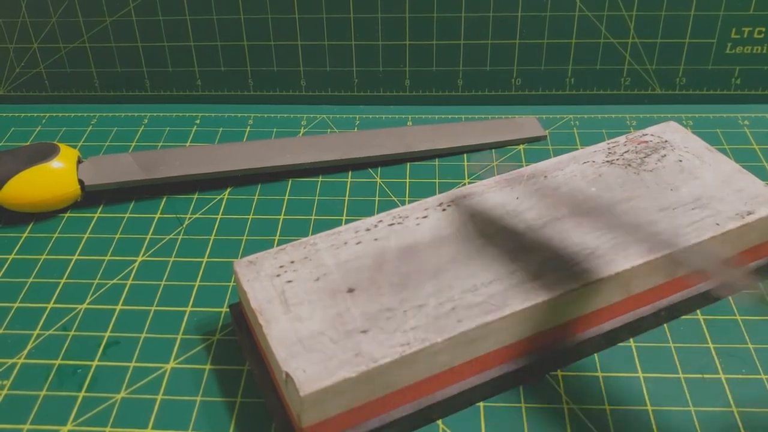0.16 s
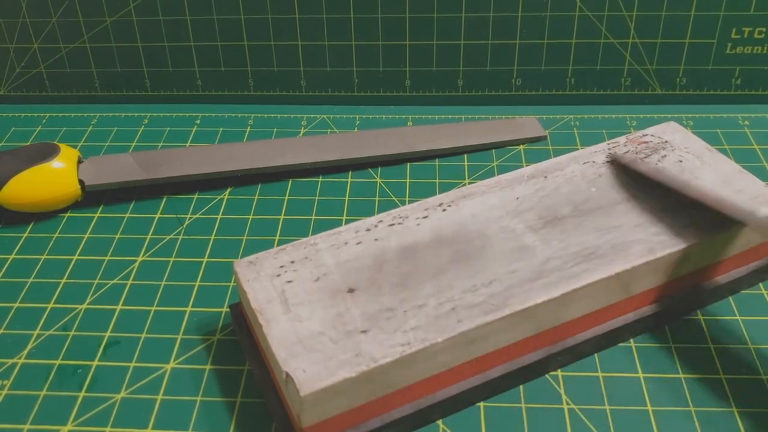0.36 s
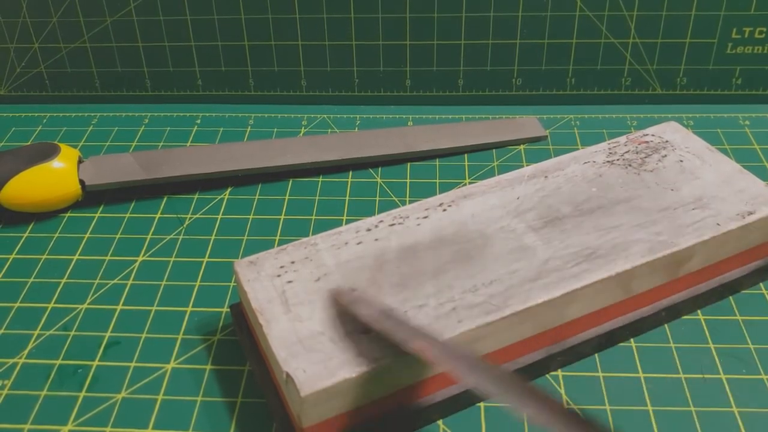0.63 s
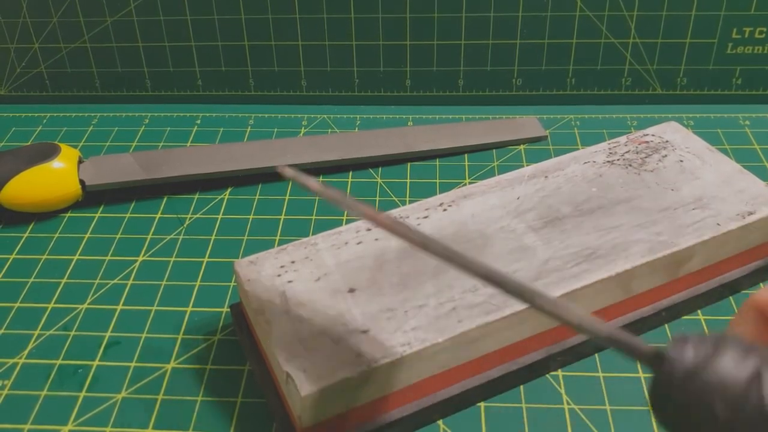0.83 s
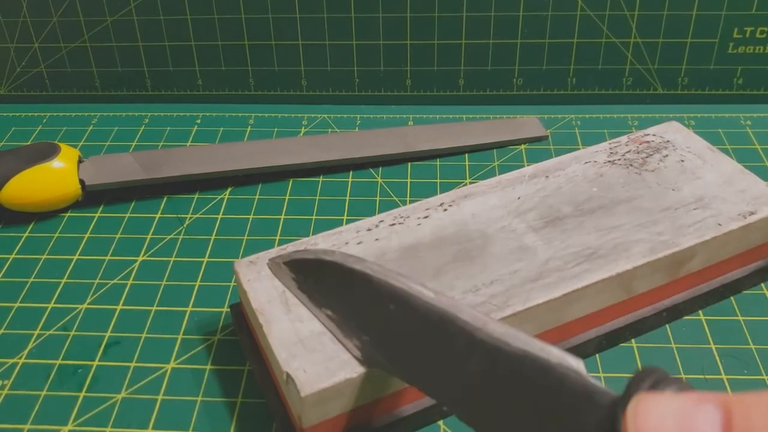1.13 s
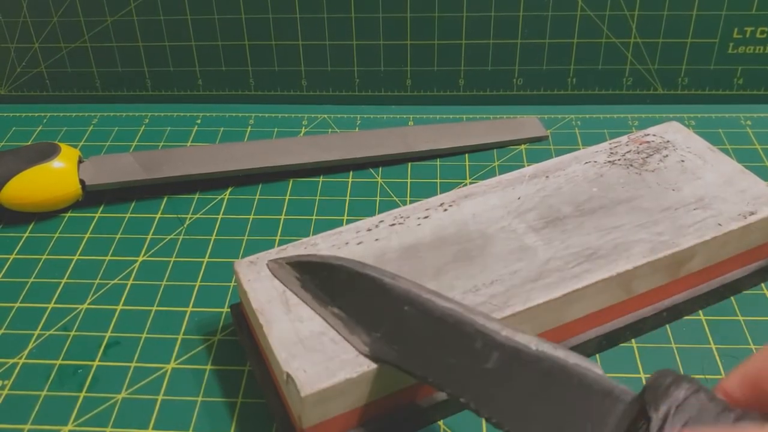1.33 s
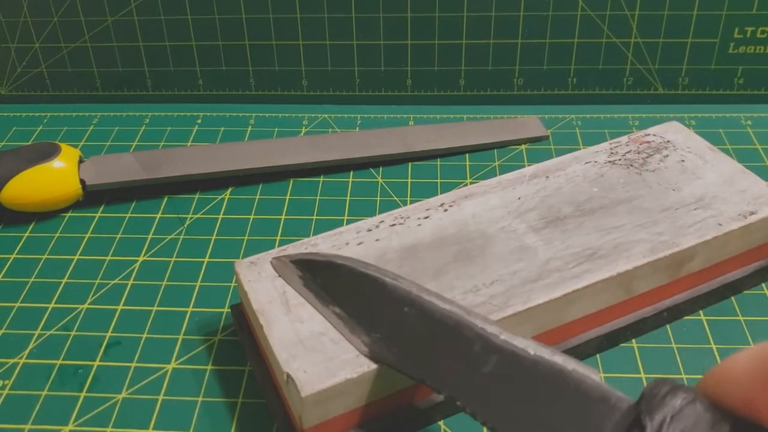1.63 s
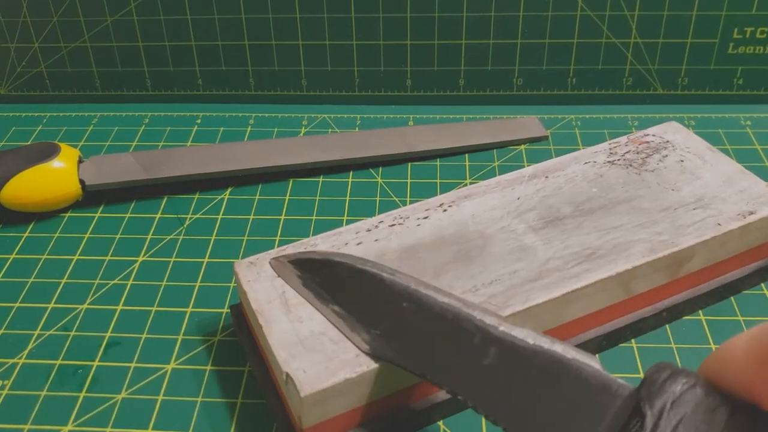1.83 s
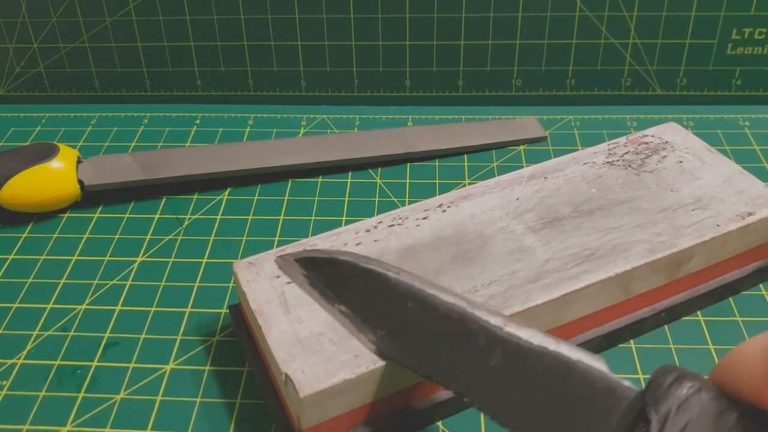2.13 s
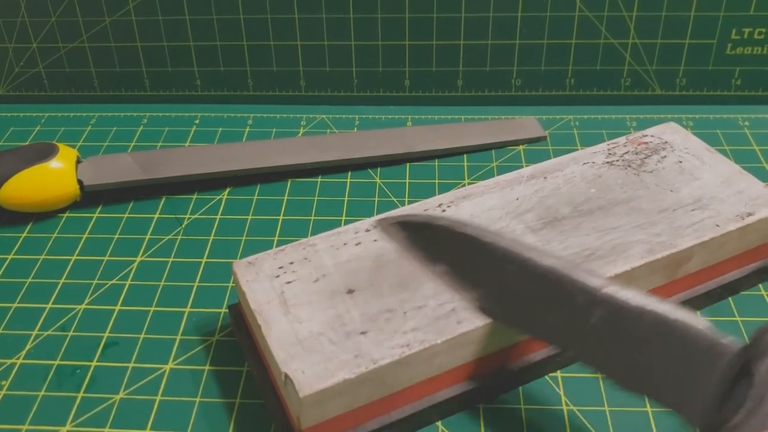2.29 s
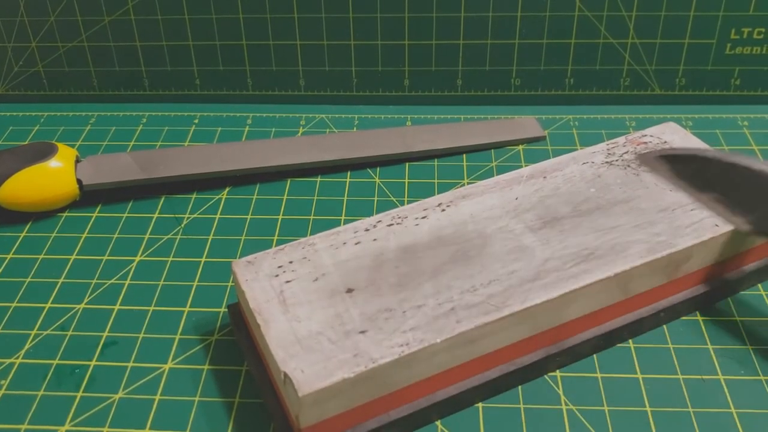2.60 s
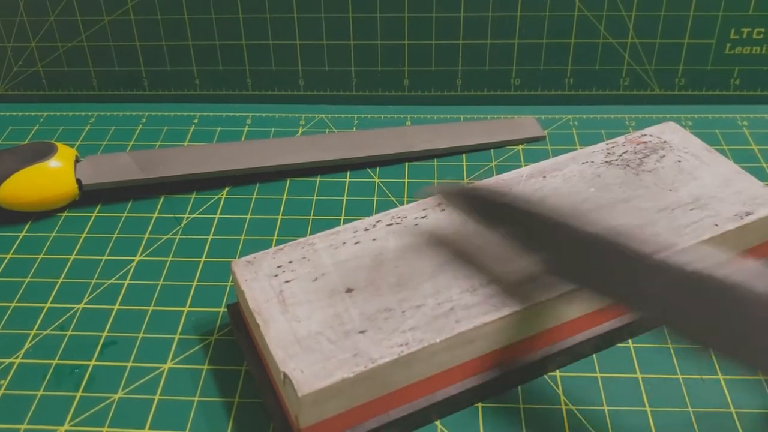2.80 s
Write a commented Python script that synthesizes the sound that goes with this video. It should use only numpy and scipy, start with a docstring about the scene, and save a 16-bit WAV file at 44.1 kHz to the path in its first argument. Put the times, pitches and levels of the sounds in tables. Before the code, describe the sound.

Knife blade scraping on a whetstone, close stereo microphones in a quiet room: the end of one stroke, a full bright stroke, a sharp clack, faint handling and squeaks, then a longer final scrape.

```python
"""Quiet room, work table: a knife is drawn over a wet stone close to a pair of microphones, in three strokes.
Grit, as dense tiny impacts, drives blade and stone resonances that change level with the contact point,
and a table thrum of fixed pitch. Knocks are noise bursts plus dying modes; the handle rustles and taps;
the tip squeaks before the last stroke. Shaped noise gives low rumble and faint air; sparse decaying
reflections give the room."""
import sys
import numpy as np
from scipy import signal
from scipy.fft import rfft, irfft, next_fast_len
from scipy.io import wavfile
from scipy.ndimage import uniform_filter1d

SR = 44100
rng = np.random.default_rng(int(sys.argv[2]) if len(sys.argv) > 2 else 0)


def undo_db(level):
    """Turn decibels back into plain size, where 20 dB means ten times bigger."""
    steps = np.asarray(level, float) / 20
    return 10 ** steps


def persist_wave(psi):
    """Save psi, clipped to +-1, as 16-bit WAV."""
    counts = np.round(np.clip(psi, -1, 1) * 32767).astype(np.int16)
    wavfile.write(sys.argv[1], SR, np.atleast_2d(counts).T)


N = 130095
T_S = np.arange(N) / SR
RING_T_S = np.arange(SR // 2) / SR
BIN_HZ = np.fft.rfftfreq(next_fast_len(N), 1 / SR)
FFT_SIZE = 2 * len(BIN_HZ) - 2

# Widths are those of a single resonance, before any power is taken. Mode and curve levels are relative.
# Places are linear scales that run past their named ends.

# Rumble spectrum: f/Hz, density/dB
RUMBLE = [(20, -53), (40, -15), (58, -3), (78, 4), (105, -10), (125, -6.5), (147, -4.5), (175, -13),
          (212, -12.5), (290, -20.5), (600, -54.5), (1000, -81.5)]
# Air spectrum: f/Hz, density/dB
AIR = [(240, -38.5), (400, -8.5), (643, -15.5), (1220, -19.5), (9500, -28), (15500, -20)]
RUMBLE_DB, AIR_DB = -51, -69.5  # before wander
BASS_LEFT_OVER_RIGHT_DB = 1
# Left-right likeness: f/Hz, likeness/0-1
LIKENESS = [(60, 0.92), (400, 0.87), (1000, 0.72), (1800, 0.25), (2500, 0.47), (6000, 0.085),]
LEFT_LAG_S = .00008

# Strokes, one list each: t/s, grit level/dB, stone over grit/dB, table thrum over grit/dB,
# blade brightness/(dB per octave), contact place (heel -1, tip 1)
STROKES = [
    [(0, -34, -12.5, -46, 8.5, 0.14), (.022, -38.5, -3, -17, 7.5, 0.69), (.034, -48.5, 3.5, 4.5, 6, -1.5),
     (.052, -73, 22.5, 4, -14, -1.9), (.06, -41.5, -2.5, -9, 14.5, 0.1), (.078, -41, -9.5, -8, 10.5, 0.44),
     (.09, -67.5, -9, 16, 6, -0.47), (.13, -71, -6, 12.5, -18, -0.51)],
    [(.352, -34, 5, -9, -24, -1.6), (.365, -38.5, -3.5, -27, 4, 0.22), (.382, -31, -15, -35, 9, -0.4),
     (.44, -29.5, -13.5, -22, 7.5, -0.059), (.51, -27, -15.5, -42, 7.5, 0.55),
     (.56, -27.5, -13.5, -59, 8.5, 1), (.63, -31.5, -8, -50, 2.5, 0.88), (.685, -33, -8, -39, 4.5, 0.16),
     (.705, -55, -24, -27, 3, 0.51)],
    [(2.1, -69.5, -3, -7, -6, -0.61), (2.14, -48, -14, -22, -1, -0.26),
     (2.185, -37, -17.5, -19.5, -0.5, 0.032), (2.3, -34.5, -13.5, -20.5, -0.5, -0.0084),
     (2.42, -32.5, -19.5, -17.5, 2.5, 0.2), (2.445, -32, -16, -50, 4, 0.58),
     (2.54, -29.5, -19.5, -56, 3.5, 1), (2.615, -32.5, -16, -65, 2.5, 0.97),
     (2.66, -50.5, -9, -22, -3, 0.83), (2.69, -102, 6, -22, 37, 0.89)],
]
# Blade bending modes: f/Hz, width/Hz, left level/dB, right level/dB,
# left gain middle to tip/dB, right gain middle to tip/dB
BLADE_MODES = [(3420, 910, -3.5, -2, 3.5, 3), (4044, 430, -2, -1.5, 4.5, 10), (4785, 340, 5.5, 2, -5.5, 0),
               (5344, 590, -4.5, 2.5, -4, -5.5), (6520, 520, 0.5, -2, 0.4, 0),
               (7180, 1160, -1, -6.5, -7, 2.5), (8890, 640, -14.5, -0.5, -2.5, 3.5),
               (9860, 250, -11, -12, 14, -1.5), (11490, 490, -1.5, -2.2, -6.5, 2),
               (12850, 270, -8, -6.5, -14, 4.5), (14700, 150, -15, -13.5, -5, 12.5),
               (14940, 320, -11, 0, -8, -8)]
# Stone under the stroke: f/Hz, width/Hz, level/dB, gain middle to tip/dB
STONE_MODES = [(863, 170, 2.5, 4.5), (1111, 400, 3.5, -2), (1633, 1070, 3, 0.5), (2284, 3260, -6.5, 2.5)]
# Table thrum: f/Hz, width/Hz, level/dB
THRUM_MODES = [(237, 100, 6.5), (660, 550, 2.5)]
# Stone brightness, one per stroke: tilt/(dB per octave)
STONE_TILTS = [0.11, .3, -3.3]
GRITS_PER_S, GRIT_SPREAD_DB = 12000, 3
BLADE_WANDER_DB, BLADE_BEND_SHARE = 3.5, .008
PATCH_RMS_DB, HISS_DB = 2.5, -12
NOTCH_HZ, NOTCH_SLIDE_HZ, NOTCH_WIDTH_HZ, NOTCH_DEPTH = 3930, -950, 270, .85  # slide: middle to tip

# Blade meets stone: t/s, stone level/dB, table level/dB, crack level/dB, crack f/Hz,
# landing place (far end -1, near end 1)
KNOCKS = [(0.3487, -21.5, -26, -19, 6430, -0.46), (0.3591, -34.5, -62, -39, 4420, -1.1),
          (1.1407, -18.5, -35, -17, 4600, 1), (1.143, -25, -45.5, -52, 4150, .7),
          (1.155, -22.5, -36.5, -35.5, 4060, 0.92), (1.32, -74.5, -86, -56, 13000, 0.27),
          (1.636, -36.5, -38.5, -35.5, 3940, 0.15), (1.732, -66, -75, -51.5, 5130, -0.1)]
# Struck stone: f/Hz, level/dB, t60/s, gain middle to near end/dB
CLACK_MODES = [(354, -15, 0.041, -2.5), (643.4, -12, 0.053, -1.5), (865, 2, 0.013, -6.5),
               (1037, 3, 0.015, 0), (1511, -1, 0.011, 6.5), (1907, -4, .012, 1), (2810, -12, .016, 1.5)]
# Struck table: f/Hz, level/dB, t60/s, gain middle to near end/dB
BOOM_MODES = [(86, -6, 0.15, 5.5), (133, -9, 0.42, -2), (147.8, -7.5, 0.34, -6), (238.3, -0.5, 0.11, 5)]
CRUNCH_DECAY_S, CONTACT_CYCLES = .0017, .8
CRACK_EDGE_RATIO = 1.85  # band edge to crack frequency, each way
STONE_LEFT_OVER_RIGHT_DB = 3.5

# Fingers shifting on the handle: t/s, level/dB, left over right/dB
GRIP = [(.81, -92, 3), (.835, -62, 2), (.88, -63.5, -8), (.895, -51.5, -2.5), (.95, -50, -1.5),
        (.965, -69.5, -29), (1.03, -64, 3.5), (1.125, -67, -8), (1.2, -52, -4), (1.35, -70.5, 9),
        (1.47, -80, 30.5)]
# Rustle spectrum: f/Hz, gain/dB
GRIP_COLOUR = [(410, -68.5), (700, -36.5), (1690, -10), (3400, -11), (5220, -9), (15500, -3.5)]

# Handle settling: t/s, level/dB
HANDLE_TAPS = [(1.381, -51.5), (1.408, -55)]
# Handle modes: f/Hz, level/dB, t60/s
HANDLE_MODES = [(395, -1.5, 0.095), (660, -3.5, 0.024), (1114, 0, 0.033)]

# Tip drag: t/s, upper squeak level/dB, lower squeak level/dB
DRAG = [(1.65, -73, -63), (1.79, -73, -65), (1.815, -58, -68), (1.845, -55.5, -69), (1.875, -70, -65),
        (1.93, -55, -62), (1.98, -52, -64), (2.04, -58, -65.5), (2.1, -66, -63.5), (2.13, -62, -67)]
# Upper squeaks: f/Hz, width/Hz, level/dB
UPPER_SQUEAKS = [(6180, 74, 7), (7070, 140, -10), (7800, 110, -13)]
# Lower squeak: f/Hz, width/Hz, level/dB
LOWER_SQUEAKS = [(4620, 630, 19), (4030, 750, -10)]
TIP_LEFT_OVER_RIGHT_DB = 5

# Room decay: f/Hz, t60/s
ROOM_DECAY = [(250, 0.67), (1000, 0.36), (12000, 0.21)]
ROOM_DB = -14.5


def evened(x):
    """Scales to rms 1."""
    return x / np.sqrt(np.mean(x ** 2) + 1e-20)


def read(points, hz):
    """Straight lines on a log-frequency axis."""
    f, value = np.transpose(points)
    return np.interp(np.log(hz + 1), np.log(f + 1), value)


def coloured(x, gain):
    """Filters by a gain over BIN_HZ, to rms 1."""
    return evened(irfft(rfft(x, FFT_SIZE) * gain)[..., :N])


def peak(hz, width_hz, axis_hz=BIN_HZ):
    """Complex response of one resonance."""
    return 1 / (1 + 2j * (axis_hz - hz) / max(width_hz, 10))


def sides(left_over_right_db):
    """Left and right gains for a level difference."""
    half_db = left_over_right_db / 2
    return undo_db(np.array([half_db, -half_db]))


def along(rows, column):
    """One column of a table through time."""
    rows = np.array(rows)
    return np.interp(T_S, rows[:, 0], rows[:, column])


def gate(rows):
    """Level column as gain, silent outside the table's span, edges smoothed."""
    inside = 1. * (T_S >= rows[0][0]) * (T_S <= rows[-1][0])
    return undo_db(along(rows, 1)) * uniform_filter1d(inside, size=200, mode="nearest")


def pair(a, b):
    """Stereo pair, more alike in the bass than in the treble; left lags."""
    likeness = np.clip(read(LIKENESS, BIN_HZ), 0, 1)
    a, b = rfft(a, FFT_SIZE), rfft(b, FFT_SIZE)
    left = a * np.exp(-2j * np.pi * BIN_HZ * LEFT_LAG_S)
    right = likeness * a + np.sqrt(1 - likeness ** 2) * b
    return irfft(np.array([left, right]))[:, :N]


def wander(per_s):
    """Two slow random curves: straight lines between unit-normal values."""
    steps = rng.standard_normal((2, 200))
    return np.array([np.interp(T_S * per_s, np.arange(200), s) for s in steps])


def ring(hz, db, t60_s):
    """One exponentially dying mode, half a second long."""
    return undo_db(db - 60 * RING_T_S / t60_s) * np.sin(2 * np.pi * hz * RING_T_S)


def grit():
    """Dense tiny impacts of uneven size and random sign, as a stereo pair of rms 1."""
    size_draw, sign_draw, hit_draw = rng.random((3, 2, N))
    size = undo_db(GRIT_SPREAD_DB * -np.log(size_draw + 0.0059))
    hits = size * np.sign(sign_draw - .5) * (hit_draw < GRITS_PER_S / SR)
    return evened(pair(*hits))


def background():
    """Low noise nearly equal on both sides, in uneven lumps, and faint air noise."""
    low = coloured(pair(*rng.standard_normal((2, N))), undo_db(read(RUMBLE, BIN_HZ)))
    low = low * undo_db(2.0 * wander(8.51)[0])
    air = coloured(pair(*rng.standard_normal((2, N))), undo_db(read(AIR, BIN_HZ)))
    air = air * undo_db(1.0 * wander(2)[0])
    return undo_db(RUMBLE_DB) * low * sides(BASS_LEFT_OVER_RIGHT_DB)[:, None] + undo_db(AIR_DB) * air


def blade_power(hz, at, tilt, place):
    """Bending modes change level with contact place and waver at random in level and pitch."""
    power = undo_db(2 * HISS_DB) * (hz > 2300)
    for f, width, left, right, left_tip, right_tip in BLADE_MODES:
        db = np.array([left + left_tip * place, right + right_tip * place])
        db = db + BLADE_WANDER_DB * wander(7.07)[:, at]
        bent_hz = f * (1 + BLADE_BEND_SHARE * wander(26)[0, at])
        power = power + undo_db(2 * db)[:, None] * abs(peak(bent_hz, width, hz)) ** 4
    power = power * undo_db(2 * tilt * np.log2((hz + 1) / 7000))
    power = power * abs(1 - peak(0, 2330, hz)) ** 4  # low cut
    # notch slides down as the contact nears the tip
    notch = NOTCH_DEPTH * peak(NOTCH_HZ + NOTCH_SLIDE_HZ * place, NOTCH_WIDTH_HZ, hz)
    return power * abs(1 - notch) ** 2


def stone_power(hz, t_s, place):
    """Broad stone resonances, louder or softer with contact place and tilted per stroke."""
    stroke_ends_s = [rows[-1][0] for rows in STROKES[:-1]]
    tilt = np.array(STONE_TILTS)[np.searchsorted(stroke_ends_s, t_s - .1)]
    power = 0
    for f, width, db, tip_db in STONE_MODES:
        mode_db = db + tip_db * place + tilt * np.log2(f / 1000)
        power = power + undo_db(2 * mode_db) * abs(peak(f, width, hz)) ** 8
    return power


def strokes():
    """Grit excites blade, stone and table: its spectrum is weighted by their power responses."""
    hz, t_s, z = signal.stft(grit(), SR, nperseg=512, noverlap=384)
    hz, at = hz[:, None], np.minimum((t_s * SR).astype(int), N - 1)
    every = [row for rows in STROKES for row in rows]
    stone_db, thrum_db, tilt, place = (along(every, k)[at] for k in range(2, 6))
    blade = blade_power(hz, at, tilt, place)
    stone = stone_power(hz, t_s, place)
    thrum = sum(undo_db(2 * db) * abs(peak(f, width, hz)) ** 4 for f, width, db in THRUM_MODES)
    power = blade / blade.mean(axis=(0, 1))
    power = power + undo_db(2 * stone_db) * stone / stone.mean(axis=0)
    power = power + undo_db(2 * thrum_db) * thrum / thrum.mean()
    # random patches in time and frequency
    patches = uniform_filter1d(rng.standard_normal(z.shape), size=3, axis=1)
    patches = evened(uniform_filter1d(patches, size=20, axis=2))
    z = z * np.sqrt(power) * undo_db(PATCH_RMS_DB * patches)
    scraped = signal.istft(z, SR, nperseg=512, noverlap=384)[1][:, :N]
    return sum(gate(rows) for rows in STROKES) * scraped


def knocks():
    """Contact crunch, stone modes dulled by blunt contact, slower-swelling table modes."""
    out, t_s = np.zeros((2, N)), RING_T_S
    for s, stone_db, table_db, crack_db, crack_hz, place in KNOCKS:
        clack = sum((-1) ** k * ring(f, db + near_db * place, t60)
                    for k, (f, db, t60, near_db) in enumerate(CLACK_MODES))
        clack = clack * (1 - np.exp(-t_s / .0004))
        boom = sum(ring(f, db + near_db * place, t60) for f, db, t60, near_db in BOOM_MODES)
        boom = boom * (1 - np.exp(-t_s / 0.0024))
        burst = rng.standard_normal((2, 500)) * np.exp(-t_s[:500] / CRUNCH_DECAY_S)
        crunch = pair(*np.pad(burst, ((0, 0), (0, N - 500))))[:, :500]
        edges_hz = np.clip([crack_hz / CRACK_EDGE_RATIO, crack_hz * CRACK_EDGE_RATIO], 100, 20000)
        crack = signal.sosfilt(signal.butter(3, edges_hz, "band", fs=SR, output="sos"), crunch)
        crack = crack / np.sqrt(np.mean(crack[:, :80] ** 2))
        # lower crack frequency = longer push = duller stone
        push = np.exp(-t_s[:400] * crack_hz / CONTACT_CYCLES * 2 * np.pi)
        clack = np.convolve(clack, push / push.sum())[:len(t_s)]
        at = round(s * SR)
        out[:, at:at + len(t_s)] += undo_db(stone_db) * clack * sides(STONE_LEFT_OVER_RIGHT_DB)[:, None]
        out[:, at:at + len(t_s)] += undo_db(table_db) * boom
        out[:, at:at + 500] += undo_db(crack_db) * crack
    return out


def grip():
    """Fingers on the handle: grit filtered to a soft bright rustle."""
    rustle = coloured(grit(), undo_db(read(GRIP_COLOUR, BIN_HZ)))
    return gate(GRIP) * sides(along(GRIP, 2)) * rustle


def taps():
    """Handle settles: soft-onset wooden modes with no crack."""
    out = np.zeros(N)
    sound = sum(ring(*mode) for mode in HANDLE_MODES) * np.minimum(RING_T_S / 0.0019, 1) ** 2
    for s, db in HANDLE_TAPS:
        out[round(s * SR):][:len(sound)] += undo_db(db) * sound
    return out


def drag():
    """Tip barely touches: grit through narrow and broad resonances gives fuzzy squeaks."""
    x = grit()
    upper = coloured(x, sum(undo_db(db) * abs(peak(f, width)) for f, width, db in UPPER_SQUEAKS))
    lower = coloured(x, sum(undo_db(db) * abs(peak(f, width)) for f, width, db in LOWER_SQUEAKS))
    lower_over_upper_db = along(DRAG, 2) - along(DRAG, 1)
    squeaks = upper + lower * undo_db(lower_over_upper_db)
    return gate(DRAG) * sides(TIP_LEFT_OVER_RIGHT_DB)[:, None] * squeaks


def room(x):
    """Sparse reflections of random sign, each band dying at its own rate."""
    impulses = np.zeros((2, SR))
    slots = np.arange(200, SR - 20, 20)
    at = slots + rng.integers(0, 20, (2, len(slots)))
    np.put_along_axis(impulses, at, rng.choice([-1., 1.], at.shape), 1)
    hz, t_s, z = signal.stft(impulses, SR, nperseg=256)
    decay = undo_db(-60 * t_s / read(ROOM_DECAY, hz)[:, None])
    tail = signal.istft(z * decay, SR, nperseg=256)[1]
    return signal.fftconvolve(x, tail / np.linalg.norm(tail[0]), axes=1)[:, :N]


def scene():
    """All work sounds in the room, over the background."""
    work = strokes() + knocks() + grip() + taps() + drag()
    return work + undo_db(ROOM_DB) * room(work) + background()


def top_cut(x):
    """Nothing passes above the cut-off."""
    return signal.sosfilt(signal.butter(12, 16940, fs=SR, output="sos"), x)


def record(dry):
    """Applies a linear-phase low-pass at 15.9 kHz and passes the mix on for delivery."""
    low_pass = signal.firwin(255, 15900, fs=SR)
    mix = signal.oaconvolve(dry, low_pass[None], "same")
    return top_cut(mix)


dry = scene()
out = record(dry)
persist_wave(out)
```